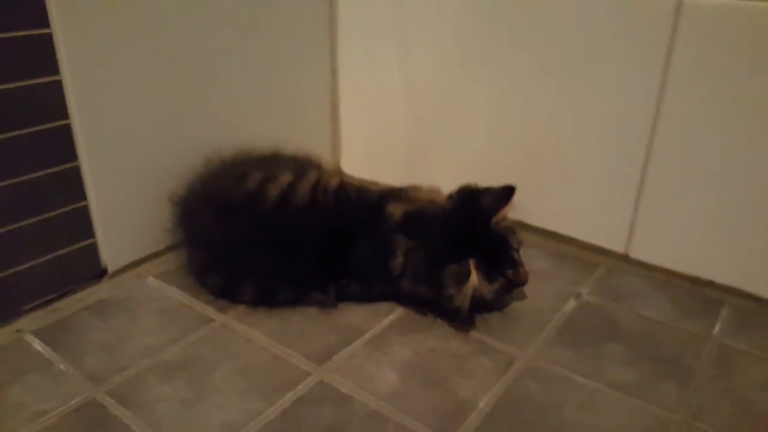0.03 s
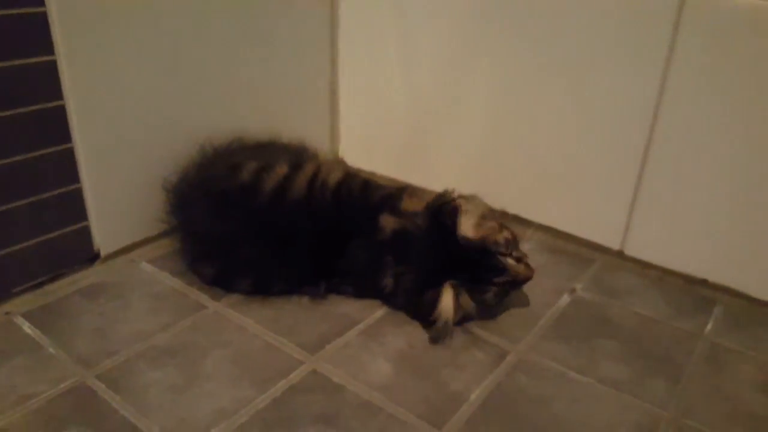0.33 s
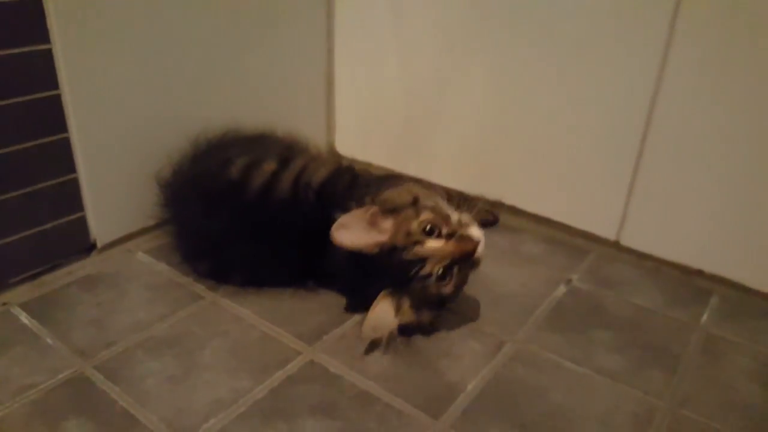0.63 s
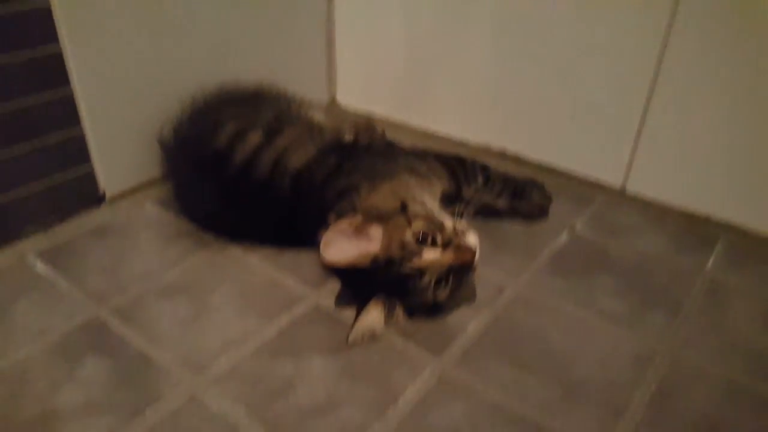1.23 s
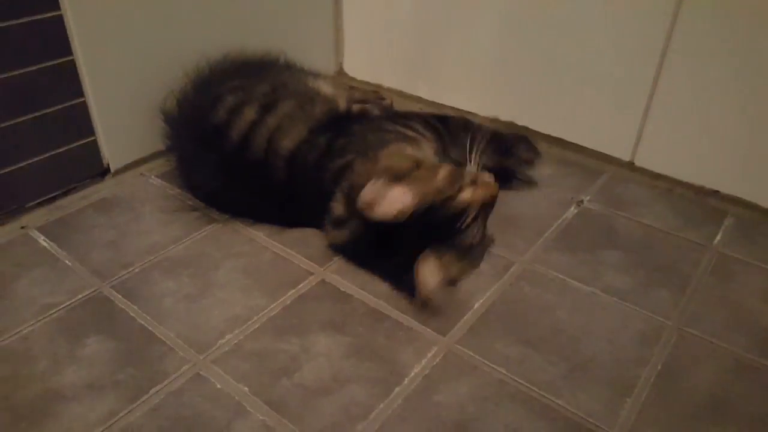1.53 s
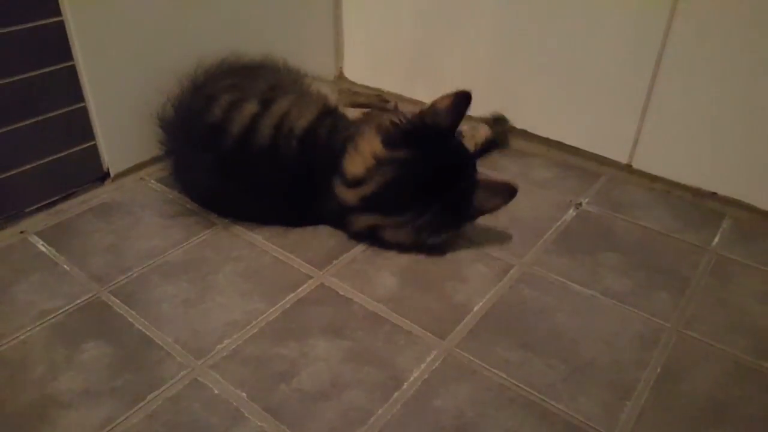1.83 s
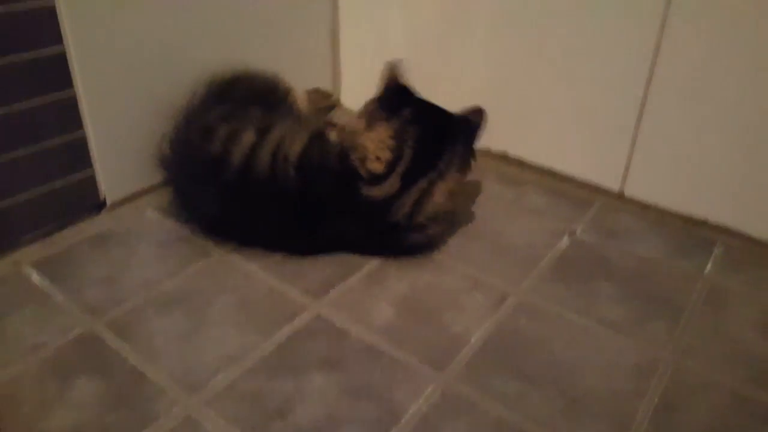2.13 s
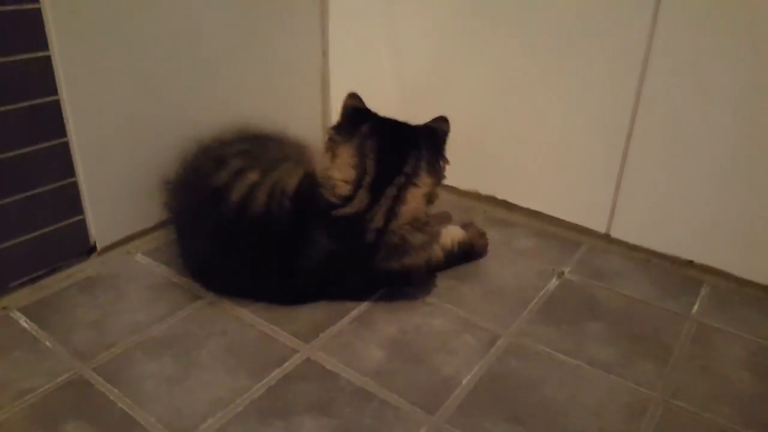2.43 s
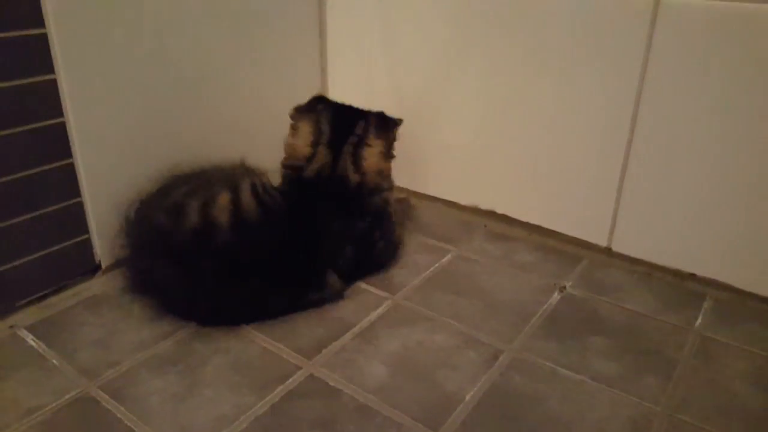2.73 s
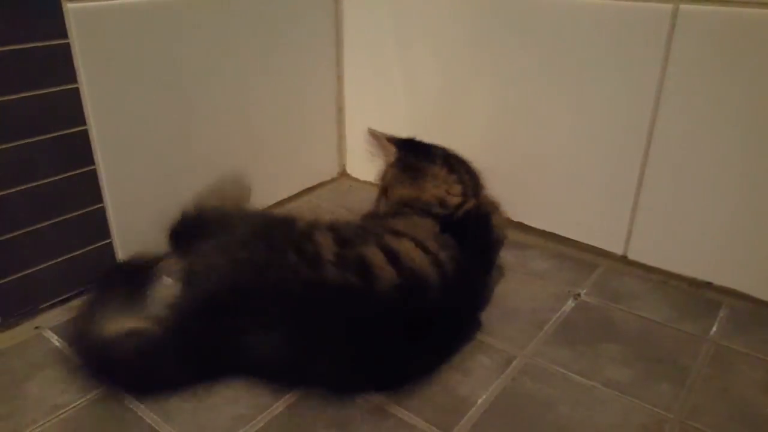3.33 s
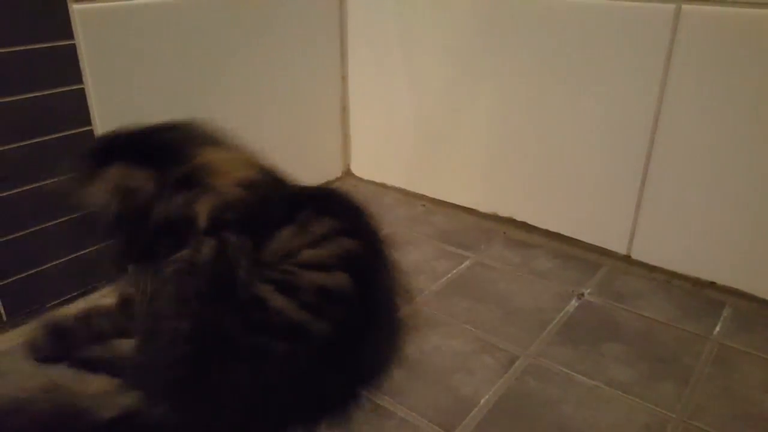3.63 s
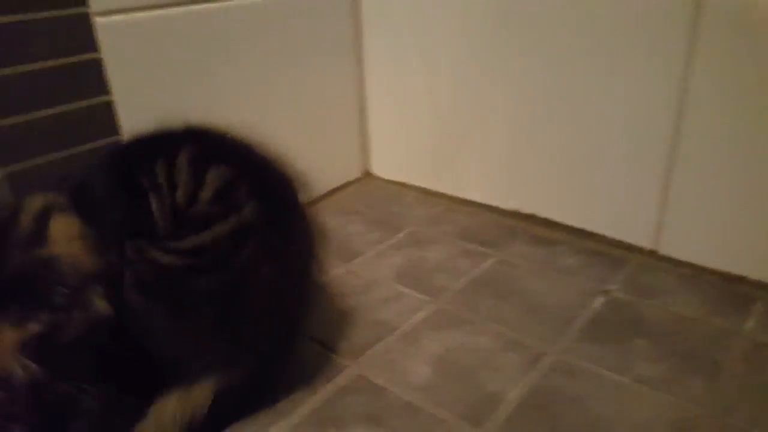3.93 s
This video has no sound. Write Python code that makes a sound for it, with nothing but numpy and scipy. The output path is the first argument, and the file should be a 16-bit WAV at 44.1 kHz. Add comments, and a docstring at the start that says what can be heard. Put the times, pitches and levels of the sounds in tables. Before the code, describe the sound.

A cat rolls on tiles in a small, quiet room, making soft rustles and thin ticks over a constant ventilation rumble. After a pause come longer sweeps of fur, a brief scuff and dull paw pats near the microphone.

```python
"""A cat rolls on the tiles of a small, quiet room; ventilation rumbles and hums throughout.
0.2-1.3 s: it rubs its head on the floor, fur brushing in swarms of tiny slips; claws and whiskers tick.
From 2.2 s: it twists its whole body round, flank and legs sweeping the tiles; more ticks follow.
Near 3.5 s: a hind foot scuffs as it flips over. Near 3.8 s: its paws pat down and drag, close by."""
import sys
import numpy as np
from scipy import signal
from scipy.fft import rfft, irfft, next_fast_len
from scipy.io import wavfile
from scipy.ndimage import uniform_filter1d, map_coordinates

SR = 44100
rng = np.random.default_rng(int(sys.argv[2]) if len(sys.argv) > 2 else 0)


def unload_wav(signal):
    """Save mono or channel-first audio to the path in sys.argv[1] as 16-bit WAV at rate SR, clipped to [-1, 1]."""
    wavfile.write(
        sys.argv[1],
        SR,
        np.round(np.clip(np.atleast_2d(signal).T, -1, 1) * 32767).astype(np.int16),
    )


N = 176400
TIME_S = np.arange(N) / SR

# paw pad spectrum (frequency [Hz], relative level [dB])
PAD_COLOUR = [(80, -14), (250, 8), (520, -3), (760, 5.5), (1050, 1), (1350, -5), (2000, -11), (3000, -11.5),
              (8000, -42)]


def head_rubs():
    """Head and cheek rasp on the floor, one resonance per stroke."""
    # (peak [s], rise [s], fall [s], level [dB], L-R [dB], tilt [dB/oct], resonance [Hz], boost [dB])
    strokes = [(0.213, 0.022, 0.05, -56.5, -7, -1, 3420, 10.5),
               (.286, 0.016, 0.018, -63.5, -6, -2.5, 3430, 6),
               (.334, 0.032, 0.075, -65, -5.5, -1, 3540, 10), (.695, 0.034, 0.022, -64, -5, 0.5, 3020, 7),
               (.95, 0.14, 0.11, -70.5, -3, -2.5, 3200, 2), (1.027, 0.024, 0.042, -59, -4.5, 0.4, 3150, 5),
               (1.095, 0.015, 0.018, -62.5, -7, -4.5, 3120, 11),
               (1.143, 0.014, 0.053, -62.5, -5, -1.5, 6600, 3),
               (1.305, 0.017, 0.012, -70.5, -4, 1, 6600, 3)]
    # spectrum (frequency [Hz], relative level [dB])
    colour = [(200, -10), (700, 0), (1300, -4), (2150, -1), (2550, -2.5), (3800, -3.5), (4500, -1.5),
              (5600, -8), (6400, -2), (7450, -11), (8500, -7), (10000, -5.5), (11400, -3.5), (14500, -11.5)]
    width_hz = 520
    return sum(rub(stroke, colour, [(hz, width_hz, boost_db)]) for *stroke, hz, boost_db in strokes)


def body_rubs():
    """Flank and legs sweep the tiles: broadband brushing."""
    # (peak [s], rise [s], fall [s], level [dB], L-R [dB], tilt [dB/oct])
    strokes = [(2.3, 0.047, 0.21, -69.5, -1, 1), (2.46, 0.053, .09, -62.5, -0.5, 0),
               (2.8, 0.17, 0.13, -67, -1, 1), (2.938, 0.02, 0.022, -64, -3, 0),
               (3.05, 0.065, 0.095, -68, 0, 2), (3.15, 0.041, 0.14, -63, -0.5, 1),
               (3.315, 0.063, 0.049, -63.5, 1, 1), (3.41, 0.11, 0.2, -60.5, -1, 1),
               (3.575, 0.049, 0.086, -64.5, -1, 1.5), (3.702, 0.069, 0.053, -61.5, 3, 3.5),
               (3.816, 0.024, 0.024, -66, 1, 3), (3.86, 0.028, 0.037, -57.5, 2, 2.1),
               (3.897, 0.016, 0.022, -60, 0, -1), (3.995, 0.057, 0.067, -64.5, 0, 1)]
    # spectrum (frequency [Hz], relative level [dB])
    colour = [(200, -21), (700, 7), (1400, 1.5), (2300, 4), (3600, -1), (5500, -3), (8000, -6.5),
              (11000, -5), (14500, -10)]
    return sum(rub(stroke, colour) for stroke in strokes)


def rub(stroke, colour, resonances=()):
    """One friction stroke: smooth brushing plus hairs that catch and slip, with a faint judder."""
    peak_s, rise_s, fall_s, level_db, pan_db, tilt_db = stroke
    slips_per_s, spread_db, cap_db, slip_db = 1700, 10, 13, -9.5
    caught = rng.random((2, N)) < slips_per_s / SR
    slips = caught * rng.standard_normal((2, N))
    slips *= amp(np.minimum(spread_db * rng.standard_normal(N), cap_db))
    brushing = rng.standard_normal((2, N))
    friction = coloured(brushing + amp(slip_db) * unit(slips), colour, tilt_db, resonances)
    lag_s = TIME_S - peak_s
    swell = np.exp(-np.where(lag_s < 0, (lag_s / rise_s) ** 2, lag_s / fall_s))
    judder_db = 0.17 * wobble(knots_per_s=85)
    return friction * swell * amp(level_db + judder_db) * panned(pan_db)


def claw_ticks():
    """Claws and whiskers strike the tiles: thin ticks."""
    # (time [s], level [dB], L-R [dB], tilt [dB/oct])
    ticks = [(0.358, -55.5, -5, -6), (.4085, -57, -3, -5), (0.4397, -59, -4, -6), (0.656, -56, 0, 2),
             (1.0176, -54, -2, 5), (1.0745, -54, -2, -1), (1.0984, -56, -5, -1), (3.0722, -56, -14, -5.5),
             (3.3134, -52, -6, -6), (3.462, -48.5, -1, 1), (3.5684, -55, 1, 0), (3.8085, -59, 2, 1),
             (3.8612, -49, 1, -6), (3.892, -60, 3, -6), (3.896, -63, 5, -6)]
    # spectrum (frequency [Hz], relative level [dB])
    colour = [(500, -23), (2500, -7), (5500, -1.5), (8000, -6.5), (12000, 1), (14500, -4)]
    return sum(amp(db) * panned(pan_db) * contact(start_s, colour, tilt_db, t60_s=0.022)
               for start_s, db, pan_db, tilt_db in ticks)


def paw_pats():
    """Soft pads land: dull pats."""
    # (time [s], level [dB], tilt [dB/oct])
    pats = [(3.765, -52, 2.5), (3.7948, -44, -3), (3.808, -55.5, 2), (3.836, -54, 3), (3.861, -55, 5),
            (3.891, -60, 2)]
    return sum(amp(db) * contact(start_s, PAD_COLOUR, tilt_db, t60_s=0.046)
               for start_s, db, tilt_db in pats)


def contact(start_s, colour, tilt_db, t60_s, rise_s=0.00037):
    """Impact on a hard floor: a fast-decaying noise burst."""
    age_s = np.maximum(TIME_S - start_s, 0)
    envelope = (1 - np.exp(-age_s / rise_s)) * amp(-60 * age_s / t60_s)
    return coloured(rng.standard_normal((2, N)), colour, tilt_db) * envelope


def foot_scuffs():
    """A hind foot skids: short, bright friction."""
    # (peak [s], rise [s], fall [s], level [dB], L-R [dB], tilt [dB/oct])
    strokes = [(3.465, 0.009, 0.023, -51, -2, -0.5), (3.488, 0.017, 0.023, -55.5, 0, -1)]
    # spectrum (frequency [Hz], relative level [dB])
    colour = [(300, -16), (1300, -8), (2600, -8.5), (3700, -2.5), (4400, -5.5), (5700, -7.5), (7000, -6.5),
              (9000, -5), (11000, -7), (14500, -7)]
    # (centre [Hz], width [Hz], boost [dB])
    resonances = [(5200, 600, 10.5), (6080, 300, 8.5), (7350, 420, 8.5)]
    return sum(rub(stroke, colour, resonances) for stroke in strokes)


def pad_drag():
    """Pads slide between the pats: dull friction."""
    # (peak [s], rise [s], fall [s], level [dB], L-R [dB], tilt [dB/oct])
    strokes = [(3.787, 0.046, 0.078, -59, 0, -.5)]
    # (centre [Hz], width [Hz], boost [dB])
    resonances = [(755, 120, 10)]
    return sum(rub(stroke, PAD_COLOUR, resonances) for stroke in strokes)


def room(x, t60_s=0.31):
    """Tiled walls reflect a short, bright tail."""
    age_s = np.arange(SR // 2) / SR
    tail = rng.standard_normal((2, len(age_s))) * amp(-60 * age_s / t60_s)
    return signal.fftconvolve(x, tail / np.linalg.norm(tail[0]), axes=1)[:, :N]


def ventilation():
    """Swelling rumble, rushing air and narrow fan and duct tones."""
    # spectra (frequency [Hz], relative level [dB])
    rumble_colour = [(15, -55), (24, -44), (31, -14), (40, -12.5), (52, -14), (66, -3.5), (80, 2.5),
                     (102, -1.5), (119, 3.5), (133, -11), (165, -13.5), (190, -28), (260, -53), (500, -77)]
    air_colour = [(30, -37), (150, 2.5), (235, 0.5), (330, -2.5), (450, -4.5), (620, -10.5), (760, -10),
                  (950, -13), (1250, -12.5), (1700, -19), (3000, -23.5), (5000, -29), (8500, -33),
                  (12000, -30.5), (14500, -30)]
    # rumble swells (time [s], level [dB])
    rumble_levels = [(0, -41.5), (.22, -40.5), (.4, -43.5), (.5, -40.5), (.62, -43.5), (.74, -40),
                     (1.08, -44), (1.19, -41), (1.4, -39.5), (1.53, -50), (1.7, -42.5), (1.96, -42),
                     (2.16, -42.5), (2.29, -48.5), (2.5, -40.5), (2.86, -37), (3.1, -39), (3.3, -41),
                     (3.7, -43.5), (3.88, -39.5), (4, -45)]
    # fan and duct tones (centre [Hz], width [Hz], level [dB])
    duct_tones = [(100.05, 3, -53), (199, 7.4, -69), (238.5, 8.2, -65), (284.8, 3.7, -70.5),
                  (398.4, 37, -74.5), (736, 11.3, -76), (775, 4.2, -85.5), (2090, 110, -82.5)]
    rumble = steadied(diffuse(lambda hz: amp(along(rumble_colour, hz))))
    rumble *= amp(np.interp(TIME_S, *np.transpose(rumble_levels)))
    air_db, flutter_db = -57.5, 0.72
    air = diffuse(lambda hz: amp(along(air_colour, hz)))
    air *= amp(air_db + flutter_db * wobble(knots_per_s=6.66))
    tones = sum(amp(db) * diffuse(lambda hz: band(hz, centre_hz, width_hz, order=4))
                for centre_hz, width_hz, db in duct_tones)
    return rumble + air + tones


def duct_hum():
    """One duct tone wavers in pitch and swells at uneven times."""
    # (time [s], peak level [dB])
    swells = [(.1, -65.5), (.275, -56.5), (.83, -60), (1.0, -56.5), (1.11, -63), (1.39, -61.5), (1.46, -61),
              (1.69, -59.5), (2.23, -62.5), (2.38, -61), (2.95, -59.5), (3.15, -66.5), (3.28, -65),
              (3.46, -58), (3.6, -61.5), (3.81, -61.5), (3.91, -59)]
    pitch_hz, waver_hz, rest_db, swell_s = 387.9, 4.87, -68.5, 0.024
    phase = 2 * np.pi * np.cumsum(pitch_hz + waver_hz * wobble(knots_per_s=22.04)) / SR
    power = amp(rest_db) ** 2
    for peak_s, db in swells:
        power += amp(db) ** 2 * np.exp(-((TIME_S - peak_s) / swell_s) ** 2)
    return np.sqrt(2 * power) * np.sin(phase)


def diffuse(gain):
    """Room-filling stereo noise, rms 1: channels alike in the bass, unrelated in the treble."""
    # (frequency [Hz], L-R correlation [-1..1])
    coherence = [(30, 0.98), (90, 1), (140, 0.97), (250, -0.017), (500, 0.84), (1000, -0.11), (2000, 0.075),
                 (12000, -0.029)]

    def mid_side_gains(hz):
        angle = np.arccos(np.clip(along(coherence, hz), -.999, .999)) / 2
        return gain(hz) * np.array([np.cos(angle), np.sin(angle)])

    mid, side = filtered(rng.standard_normal((2, N)), mid_side_gains)
    return unit(np.array([mid + side, mid - side]))


def steadied(x, window_s=0.11):
    """x with slow level drift evened out, rms 1."""
    span = int(window_s * SR)
    power = np.mean(x ** 2, axis=0)
    slow_power = uniform_filter1d(uniform_filter1d(power, span), span)
    return unit(x / np.sqrt(np.abs(slow_power) + 1e-12))


def coloured(x, colour, tilt_db, resonances=()):
    """x shaped by a spectrum, a tilt per octave and resonances, rms 1."""
    def response(hz):
        boost_db = sum(db * band(hz, centre_hz, width_hz) for centre_hz, width_hz, db in resonances)
        octaves = np.log2(hz / 1000 + .1)
        return amp(along(colour, hz) + boost_db + tilt_db * octaves)

    return unit(filtered(x, response))


def filtered(x, response):
    """x through a zero-phase gain, response(hz)."""
    size = next_fast_len(N + 8192)
    return irfft(rfft(x, size) * response(np.fft.rfftfreq(size, 1 / SR)), size)[..., :N]


def band(hz, centre_hz, width_hz, order=2):
    """Bell curve of peak 1, width_hz wide at half height."""
    return 1 / (1 + ((hz - centre_hz) / width_hz * 2) ** order)


def along(points, hz):
    """(Hz, value) points interpolated on a log axis."""
    knots_hz, values = np.transpose(points)
    return np.interp(np.log(hz + 1), np.log(knots_hz + 1), values)


def wobble(knots_per_s):
    """Smooth random curve."""
    knots = rng.standard_normal(int(N * knots_per_s / SR) + 4)
    return map_coordinates(knots, [TIME_S * knots_per_s])


def panned(db):
    """Channel gains for an L-R difference."""
    return unit(amp([[db / 2], [-db / 2]]))


def amp(db):
    """dB to gain."""
    return 10 ** (np.asarray(db) / 20)


def unit(x):
    """x at rms 1."""
    return x / np.sqrt(np.mean(x ** 2) + 1e-20)


def scene():
    """The cat and its reflections over the ventilation."""
    background = ventilation() + duct_hum()
    cat = head_rubs() + body_rubs() + claw_ticks() + paw_pats() + foot_scuffs() + pad_drag()
    return cat + amp(db=-6) * room(cat) + background


def record(dry):
    """Brick-wall low-pass."""
    cutoff_hz = 14550
    return filtered(dry, lambda hz: hz < cutoff_hz)


dry = scene()
out = record(dry)
unload_wav(out)
```